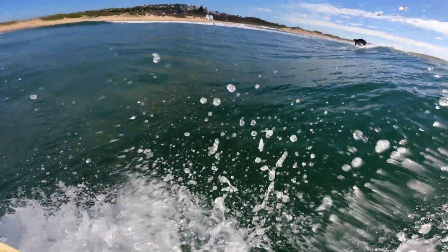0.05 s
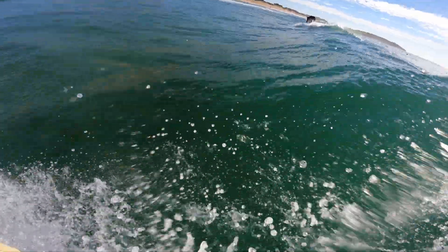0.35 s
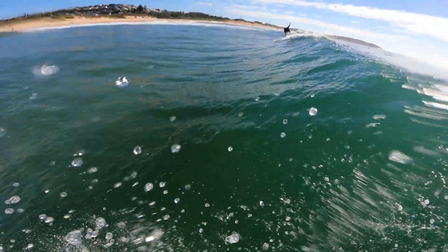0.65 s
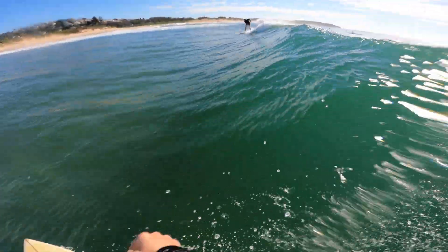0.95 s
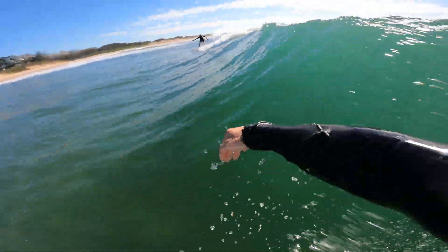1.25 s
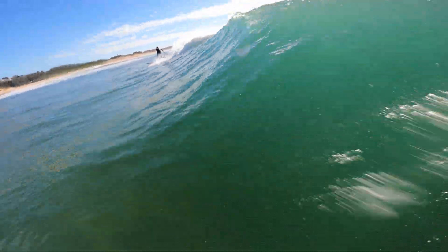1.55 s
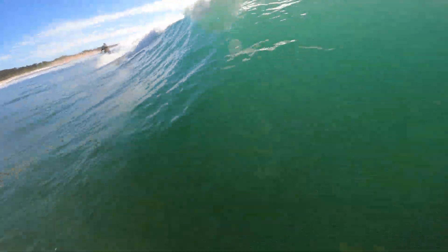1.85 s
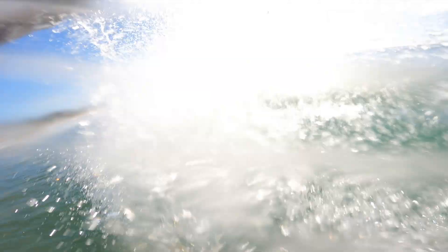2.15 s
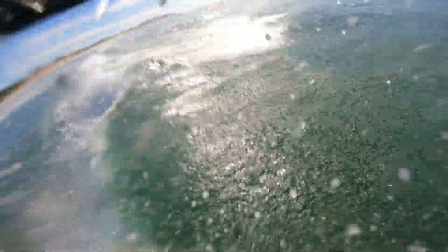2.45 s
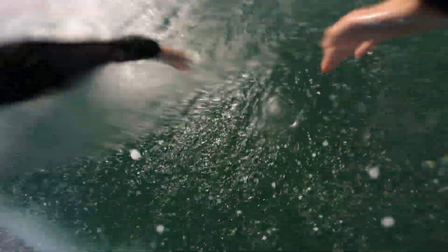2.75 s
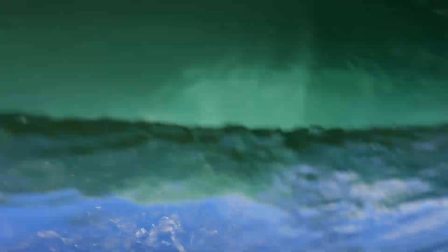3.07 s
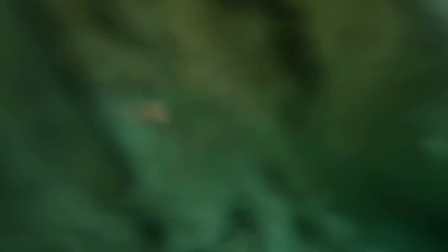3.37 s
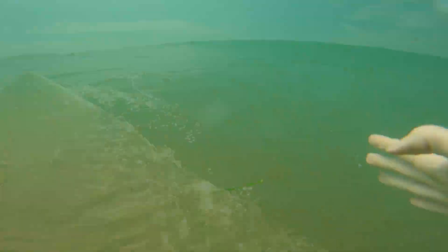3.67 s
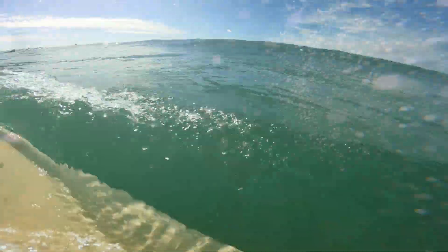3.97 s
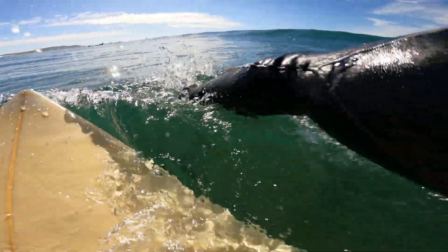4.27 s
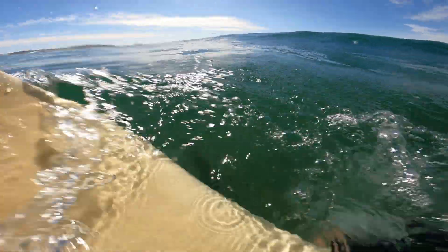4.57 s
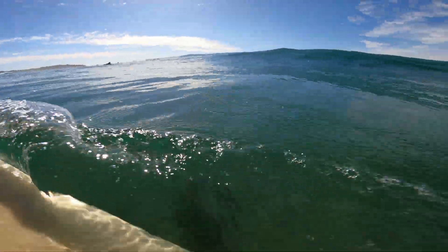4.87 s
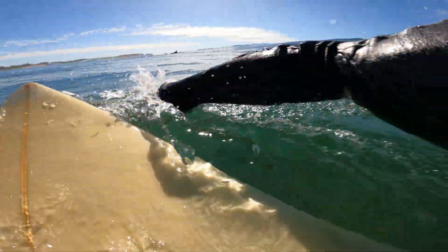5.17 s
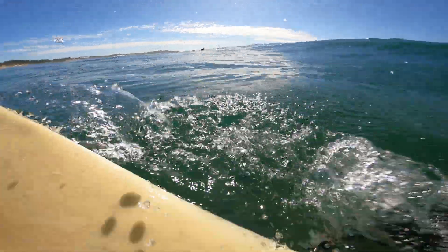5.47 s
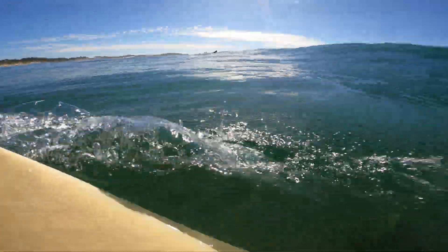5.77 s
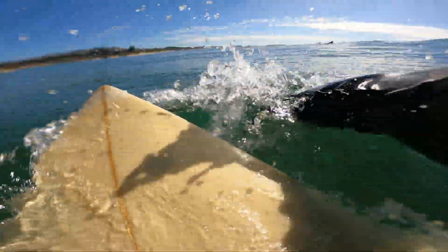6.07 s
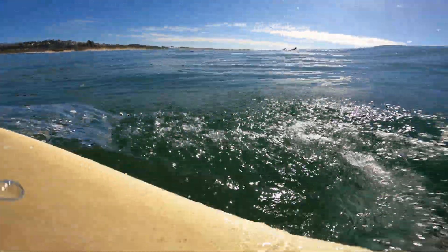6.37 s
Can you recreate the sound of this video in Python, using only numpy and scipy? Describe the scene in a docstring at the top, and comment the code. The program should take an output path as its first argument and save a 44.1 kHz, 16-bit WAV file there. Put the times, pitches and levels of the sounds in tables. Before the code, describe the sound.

From the start, water rushes past a surfboard with a fine hiss of spray, while wind and water buffet the close microphone with a steady low rumble. At about 2.3 seconds a wave crashes over it: sharp splashes and slaps lead into surges of churning white water, crackling foam and ticking drops, with more hard slaps around 3.2 seconds. At 3.6 seconds the microphone sinks, and the sound turns muffled and deep as big bubbles gurgle in gulps. It surfaces at about 4 seconds and the rumble is now much softer. Water laps and glugs against the board, and three arm strokes slosh in at roughly 4.2, 5.1 and 5.9 seconds, the middle one gentler. Each leaves a fizz of foam and a low push of water, with scattered drips and small slaps. The lapping continues until the end, at about 6.6 seconds.

```python
"""A surfer rides a wave, a camera close to the board: the wake rushes and throws spray while wind and
water buffet the microphone port. At 2.25 s the surfer falls; the lip crashes over the camera in
churning white water, slaps and drops. At 3.6 s the camera sinks and big bubbles gurgle.
At 4 s it surfaces, and three arm strokes slosh and fizz beside the board."""
import sys
import numpy as np
from scipy import signal
from scipy.fft import rfft, irfft, next_fast_len
from scipy.io import wavfile
from scipy.ndimage import uniform_filter1d, map_coordinates

SR = 44100
rng = np.random.default_rng(int(sys.argv[2]) if len(sys.argv) > 2 else 0)


def wrap_up_sound(samples):
    """Save the sound to the file named by the first command line argument, as 16-bit audio."""
    columns = np.atleast_2d(samples).T
    # keep every value between -1 and 1, then stretch to whole-number steps
    tamed = np.clip(columns, -1, 1)
    steps = np.round(tamed * 32767).astype(np.int16)
    wavfile.write(sys.argv[1], SR, steps)


N = 292383

FALL_S, DIVE_S, SURFACE_S = 2.25, 3.59, 3.978
# Tick of water on the housing. Each row: frequency in Hz, gain in dB.
TICK_SPECTRUM = [(500, -15), (1300, 3.5), (2200, -1.5), (3500, -8.5), (5500, -20), (7000, -35),
                 (10000, -60.5)]


def riding():
    """The rail cuts a rushing wake and throws a fine, even spray."""
    # Each row: time in seconds, relative level in dB.
    wake_levels = [(.05, -30.5), (.25, -26.5), (.35, -22), (.53, -23.5), (.62, -19.5), (.76, -23),
                   (1.03, -27), (1.09, -22), (1.19, -20.5), (1.28, -24), (1.57, -25.5), (1.66, -28.5),
                   (1.79, -30), (1.86, -37), (2.03, -30.5), (2.2, -29)]
    spray_levels = [(0.0, -38), (0.19, -45.5), (.6, -46), (0.81, -44.5), (.95, -48.5), (1.2, -50),
                    (1.35, -46.5), (1.71, -49.5), (2.2, -42)]
    # Each row: frequency in Hz, gain in dB.
    wake_spectrum = [(100, -16), (170, -5), (230, 1), (300, -0.5), (400, -4), (600, -10), (810, -10.5),
                     (1020, -34.5), (1500, -30.5), (2000, -42.5), (6000, -100.5)]
    spray_spectrum = [(400, -2.5), (850, -0.5), (1300, -7), (2000, -14), (2500, -8.5), (3000, -4),
                      (3400, -8), (4000, -20.5), (5000, -25.5), (6300, -33), (7500, -43.5), (10000, -57)]
    wake_bubbles = bubble_cloud(155.7, 1743, per_s=450, cycles=7.5, spread_db=1)
    wake = water(wake_spectrum, wake_bubbles, hiss_db=11)
    spray_bubbles = bubble_cloud(734, 7600, per_s=900, cycles=5.7, spread_db=3.5, ring_samples=300)
    spray = water(spray_spectrum, spray_bubbles, hiss_db=9.5)
    return amp(0.5) * gain_curve(wake_levels) * wake + amp(4.5) * gain_curve(spray_levels) * spray


def tumbling():
    """White water churns round the camera in surges; its foam crackles on the housing."""
    # Each row: start in seconds, hold in seconds, relative churn and foam levels in dB.
    surges = [(2.24, 0.028, -27, -26), (2.386, 0.17, -28.5, -34), (2.69, 0.076, -29.5, -34),
              (2.81, 0.071, -27, -33), (2.89, 0.078, -26.5, -39.5), (3.068, 0.095, -25, -55),
              (3.183, 0.077, -20, -39), (3.49, 0.058, -22.5, -39)]
    # Each row: frequency in Hz, gain in dB.
    churn_spectrum = [(110, -13), (190, -3), (300, -1.5), (450, -2.5), (620, -6.5), (850, -10.5),
                      (1300, -31), (6000, -85)]
    foam_spectrum = [(500, -20), (1000, 2), (1300, -2.5), (1600, -6), (2000, -8.5), (2600, -14),
                     (3200, -12.5), (4000, -24.5), (4900, -27.5), (6000, -36), (7500, -49.5), (10000, -78)]
    bed = envelope(FALL_S, DIVE_S - FALL_S, attack_s=0.016, release_s=0.025)
    churn_gain, foam_gain = amp(-33.5) * bed, amp(-42.5) * bed
    for start_s, hold_s, churn_db, foam_db in surges:
        surge = envelope(start_s, hold_s, attack_s=0.056, release_s=0.044) * bed
        churn_gain = np.hypot(churn_gain, amp(churn_db) * surge)
        foam_gain = np.hypot(foam_gain, amp(foam_db) * surge)
    churn_gain *= 1 - 0.4 * envelope(3.6, 0.11, attack_s=0.011, release_s=0.038)  # dip below the surface
    churn_bubbles = bubble_cloud(152, 1224, per_s=300, cycles=5.6, spread_db=1.5)
    churn = water(churn_spectrum, churn_bubbles, hiss_db=11)
    foam_bubbles = bubble_cloud(870, 7000, per_s=520, cycles=3, spread_db=4.5, ring_samples=300)
    foam = water(foam_spectrum, foam_bubbles, hiss_db=7) * flutter(rate_hz=130, depth_db=1)
    return churn_gain * churn + amp(-0.8) * foam_gain * foam


def submerged():
    """Under water the flow drums softly on the housing and big bubbles leave in gulps."""
    # Each row: start in seconds, hold in seconds, level in dB.
    gulps = [(3.598, 0.027, -16.5), (3.648, 0.076, -18.5), (3.76, 0.031, -19), (3.87, 0.03, -23.5)]
    # Each row: frequency in Hz, gain in dB.
    gurgle_spectrum = [(40, -14), (80, 16), (150, 12), (200, 4.5), (270, -9), (370, -3), (550, -5.5),
                       (680, -15.5), (1250, -23), (1550, -36.5), (2100, -48.5), (3200, -54), (5000, -67.5),
                       (8000, -84), (12000, -105)]
    gain = amp(-26.5) * envelope(DIVE_S, SURFACE_S - DIVE_S, attack_s=0.025, release_s=0.026)
    for start_s, hold_s, db in gulps:
        gain = np.hypot(gain, amp(db) * envelope(start_s, hold_s, attack_s=0.014, release_s=0.016))
    big_bubbles = bubble_cloud(238, 1337, per_s=770, cycles=20.6, spread_db=3)
    return gain * water(gurgle_spectrum, big_bubbles, hiss_db=7)


def paddling(drain_s=0.28, entry_over_fizz_db=11.5):
    """Water laps the board; each stroke sloshes in, leaves foam, shoves water aside, then lulls."""
    # Each row: hand entry in seconds, relative push and fizz levels in dB, fizz hold in seconds,
    # lull depth from 0 to 1, hand exit in seconds.
    strokes = [(4.203, -33.5, -43, 0.36, 0.44, 4.68), (5.118, -40, -47, 0.016, 0.4, 5.67),
               (5.878, -29, -42.5, 0.35, 0.24, 6.37)]
    # Each row: frequency in Hz, gain in dB.
    surge_spectrum = [(80, -30.5), (170, -4), (330, 1.5), (480, 1), (650, -7), (1000, -17.5), (6000, -99)]
    slosh_spectrum = [(300, -26), (550, -4.5), (750, 0), (1080, 0.5), (1300, -4.5), (1500, -9.5),
                      (1750, -14), (2100, -31.5), (3000, -30), (8000, -80.5)]
    fizz_spectrum = [(1300, -9.5), (2000, -10.5), (2500, -9), (2950, -4), (3500, -5.5), (3950, -20),
                     (4400, -15.5), (5100, -17), (5600, -26.5), (6400, -29.5), (7500, -40.5),
                     (10000, -63.5)]
    afloat = envelope(SURFACE_S, N / SR, attack_s=0.26, release_s=0.1)
    drained = envelope(SURFACE_S + drain_s, N / SR, attack_s=0.31, release_s=0.1)  # the port runs clear
    surge_gain, slosh_gain, fizz_gain = amp(-31.5) * afloat, amp(-29) * drained, amp(-46.5) * drained
    stir = np.ones(N)
    for entry_s, push_db, fizz_db, fizz_s, lull_depth, exit_s in strokes:
        entry = envelope(entry_s, 0.13, attack_s=0.19, release_s=0.13)
        foam = envelope(entry_s + 0.081, fizz_s, attack_s=0.16, release_s=0.016)
        pull = envelope(entry_s + 0.37, 0.069, attack_s=0.19, release_s=0.13)
        slosh_gain = np.hypot(slosh_gain, amp(fizz_db + entry_over_fizz_db) * entry)
        fizz_gain = np.hypot(fizz_gain, amp(fizz_db) * foam)
        surge_gain = np.hypot(surge_gain, amp(push_db) * pull)
        stir *= 1 - lull_depth * envelope(exit_s, 0.015, attack_s=0.03, release_s=0.13)
    surge_bubbles = bubble_cloud(133.2, 795, per_s=320, cycles=9.1, spread_db=2)
    surge = water(surge_spectrum, surge_bubbles, hiss_db=9.5)
    slosh_bubbles = bubble_cloud(453.3, 2450, per_s=600, cycles=25.3, spread_db=1.5)
    slosh = water(slosh_spectrum, slosh_bubbles, hiss_db=8) * flutter(rate_hz=22, depth_db=0.8)
    fizz_bubbles = bubble_cloud(1600, 7000, per_s=700, cycles=48, spread_db=0, ring_samples=700)
    fizz = water(fizz_spectrum, fizz_bubbles, hiss_db=6) * flutter(rate_hz=25, depth_db=1.5)
    lapping = amp(-0.5) * surge_gain * surge + amp(-0.3) * slosh_gain * slosh
    return stir * lapping + np.sqrt(stir) * amp(-0.5) * fizz_gain * fizz


def slaps(decay_per_cycle=3.325, crack_db=-13):
    """Solid water strikes the housing: a hard push that rebounds once or twice, a crack on top."""
    # Each row: start in seconds, relative peak in dB, pitch in Hz.
    strikes = [(2.261, -6.5, 1000), (2.272, -10, 1700), (2.351, -13.5, 1065), (2.359, -14, 1150),
               (2.397, -15, 1320), (2.497, -12, 1150), (2.502, -13, 510), (2.834, -17, 1900),
               (3.05, -21, 730), (3.206, -5.5, 1300), (3.264, -5.5, 520), (4.23, -10, 680),
               (4.634, -18, 750), (4.639, -14, 330), (4.976, -11, 600), (4.997, -18, 950)]
    track = np.zeros(N)
    t = np.arange(SR // 30) / SR
    for start_s, db, hz in strikes:
        turns = t * hz
        push = np.sin(2 * np.pi * turns) * turns ** 2 * np.exp(-decay_per_cycle * turns)
        crack = tick(t, attack_s=0.00053, decay_s=0.001)
        add(track, start_s, amp(db) * (push / np.abs(push).max() + amp(crack_db) * crack))
    return coloured(track, [(4000, -2), (7500, -17.5), (11000, -35)])


def sheets(width_octaves=0.97, spiky_db=4.5, lead_s=0.015):
    """Sheets of water hit the housing, each led by its spray: spiky bursts with a broad peak."""
    # Each row: start in seconds, relative level in dB, length in seconds, peak in Hz, treble in dB.
    hits = [(1.605, -43.5, 0.036, 4000, 10), (2.255, -19.5, 0.058, 2000, 0.5),
            (2.342, -23, 0.024, 1440, -6), (2.352, -22, 0.054, 950, -12), (2.396, -26.5, 0.047, 1440, -11),
            (2.447, -27.5, 0.039, 1200, -17), (2.489, -22, 0.015, 1300, -17), (3.159, -22, 0.018, 500, -6),
            (3.184, -22, 0.032, 1690, -6), (3.197, -16, 0.017, 600, 4), (3.251, -16.5, 0.011, 2000, 8.5),
            (3.27, -27, 0.027, 700, -2), (3.507, -26.5, 0.013, 1000, 4), (3.558, -34, 0.02, 2810, -3),
            (3.975, -36.5, 0.017, 1100, -21), (6.535, -38, 0.041, 2960, -5)]
    # Each row: frequency in Hz, gain in dB.
    sheet_spectrum = [(150, 3.5), (350, 2.5), (1000, 2), (1550, 1), (1750, -7.5), (2100, -2.5),
                      (2550, -12.5), (3050, -11), (3500, -13), (4000, -20), (4900, -20), (6000, -33),
                      (8000, -50), (12000, -55.5)]
    track = np.zeros(N)
    t = np.arange(SR // 5) / SR
    leading_spray = [(start_s - lead_s, db - 5, lead_s, hz * 1.5, treble_db + 3.5)
                     for start_s, db, _, hz, treble_db in hits]
    for start_s, db, length_s, hz, treble_db in list(hits) + leading_spray:
        swell = (1 - np.exp(-t / 0.0033)) * np.exp(-(t / length_s) ** 2)
        patter = rng.standard_normal(len(t))
        patter *= amp(spiky_db * np.repeat(rng.standard_normal(len(t)), 20)[:len(t)])
        peak = [(hz / 2 ** width_octaves, -7), (hz, 0), (hz * 2 ** width_octaves, -7)]
        body = coloured(coloured(patter, peak), sheet_spectrum)
        burst = coloured(body, [(3000, 0.0062), (7500, treble_db)])
        add(track, start_s, amp(db) * swell * unit(burst))
    return amp(-1) * track


def glugs(waver_rad=0.59, splash_db=-13, shed_db=-9):
    """An air pocket rings with a splash, glides as it opens or is squeezed, and sheds two bubbles."""
    # Each row: time in seconds, relative peak in dB, pitch in Hz, glide in octaves, decay in seconds.
    pockets = [(0.665, -23, 714, 0, .018), (2.271, -19, 1650, -0.3, 0.0062), (2.299, -23, 1400, .1, 0.0099),
               (2.341, -22, 1400, 0, 0.0049), (2.354, -17, 1120, -0.3, .014), (2.382, -20, 800, -.1, 0.012),
               (2.39, -20, 1000, 0.1, 0.011), (2.418, -27, 1860, -.1, .006),
               (3.052, -25, 730, -0.1, 0.0054), (3.081, -29, 850, -.1, 0.011), (3.104, -26, 709, .2, 0.01),
               (3.205, -11, 434, 0.14, 0.006), (3.216, -4.5, 266.5, .2, 0.0067),
               (3.251, -18.5, 2070, -.2, 0.0029), (3.263, -13, 1250, -.6, 0.0054),
               (3.277, -10.5, 543, -0.2, 0.0051), (3.292, -27, 1200, -.1, 0.0068),
               (3.295, -17, 618, -.2, 0.0065), (3.526, -11.5, 294, -0.19, 0.008),
               (3.59, -8.5, 191, 0, 0.024), (3.607, -10.5, 326.4, -0.43, 0.0055),
               (3.654, -15.5, 553, 0.011, 0.0059), (3.759, -19.5, 377, .1, 0.0097),
               (3.785, -21.5, 532.4, 0.19, 0.019), (3.881, -19.5, 559, -0.21, 0.0041),
               (4.19, -18.5, 784, 0.22, 0.0067), (4.235, -18, 536, -.6, 0.0047),
               (4.265, -24, 738, -.1, .018), (4.459, -19, 451, -0.55, 0.0045), (4.551, -18, 970, .1, .009),
               (4.563, -14.5, 262, -0.27, 0.0074), (4.593, -15.5, 950, -.1, 0.0063),
               (4.636, -18.5, 770, -.3, 0.0085), (4.639, -16, 388.4, -0.53, 0.0072),
               (4.7, -24, 1038, 0.27, 0.004), (4.738, -15.5, 983, 0.38, 0.0094),
               (4.86, -20, 990, -.1, 0.0055), (4.883, -16.5, 950, -0.38, 0.0066),
               (4.914, -18, 897, .2, 0.0068), (4.98, -16.5, 499, 0.1, 0.012),
               (4.995, -17.5, 920, 0.2, 0.008), (5.03, -19.5, 366, -0.22, 0.013),
               (5.122, -18, 351, .1, 0.0046), (5.205, -17, 930, -.1, 0.0063), (5.27, -20, 599, .1, 0.0053),
               (5.461, -20, 767, .3, 0.0079), (5.467, -14, 291, 0.057, 0.0068),
               (5.508, -15.5, 540, .15, 0.0079), (5.526, -17.5, 193, -0.53, 0.019),
               (5.527, -18, 970, 0.14, 0.009), (5.58, -18.5, 391, -0.08, 0.006),
               (5.632, -19, 1000, 0.11, 0.005), (5.713, -15, 767, 0.059, 0.0047),
               (5.735, -25, 900, -.3, 0.0061), (5.791, -16, 254.6, .2, 0.0084),
               (5.832, -15.5, 561, .1, 0.0075), (6.115, -18.5, 1110, .1, 0.022),
               (6.222, -15.5, 435.3, 0.013, 0.016), (6.281, -14.5, 373, 0.7, 0.0046),
               (6.313, -16.5, 284.2, .1, 0.0082), (6.328, -20, 324.5, -0.075, 0.0082),
               (6.405, -22, 463, .1, .006), (6.458, -17.5, 1055, 0, 0.0093), (6.468, -16, 491, 0.29, .007),
               (6.51, -19.5, 457, .2, 0.011)]
    track = np.zeros(N)
    t = np.arange(SR // 6) / SR - 1 / 20
    for peak_s, db, hz, glide_octaves, decay_s in pockets:
        age = t / decay_s
        swell = np.exp(-(np.minimum(age, 0) / 0.63) ** 2 - np.maximum(age, 0) ** 0.96)
        turns = np.cumsum(hz * 2 ** (glide_octaves * np.tanh(age))) / SR
        wall_shake = waver_rad * map_coordinates(rng.standard_normal(256), [turns / 2], mode="wrap")
        ring = np.sin(2 * np.pi * turns + wall_shake)
        splash = noise(len(t), [(hz / 4, -8), (hz, 0), (2 * hz, -9), (5 * hz, -36), (10 * hz, -80)])
        add(track, peak_s + t[0], amp(db) * swell * (ring + amp(splash_db) * splash))
        for lateness, pitch in rng.random((2, 2)):
            shed_hz = hz * (0.692 + 0.45 * pitch)
            shed = bubble(t[t >= 0] * shed_hz, cycles=14, rise=0.17)
            add(track, peak_s + 0.024 * lateness, amp(db + shed_db) * shed)
    return amp(-3) * track


def drops():
    """A drop ticks on the housing and traps one small bubble."""
    # Each row: start in seconds, relative level in dB, pitch in Hz, tick against bubble in dB.
    landings = [(.651, -31, 1050, -10), (.778, -16.5, 1490, -11), (1.089, -30.5, 1750, -2.5),
                (2.038, -17, 970, -17), (2.199, -24, 1750, -13), (2.452, -21, 1820, -12),
                (2.492, -16, 1540, -11), (2.574, -31, 1410, -7), (2.634, -21, 904, -15),
                (2.675, -18, 1580, -20), (2.706, -16, 1260, -13.5), (2.772, -25, 1230, -8),
                (2.79, -25, 1260, -9), (2.801, -19.5, 1430, -10), (2.833, -14, 1790, -8.5),
                (2.928, -25, 1360, -10), (2.939, -24, 1360, -11), (2.974, -27, 1460, -8),
                (2.988, -29, 1205, -9), (3.011, -28, 1480, -11), (3.07, -27, 1690, -15),
                (3.138, -25, 1690, -12), (3.161, -19, 1840, -10), (3.516, -14.5, 1240, -28),
                (4.221, -17.5, 1777, -16), (4.634, -27, 3100, -8), (4.704, -36, 3840, -9),
                (5.17, -25.5, 3770, -16), (5.202, -23, 1640, -10), (5.388, -22, 2550, -5),
                (6.523, -28, 3250, -1)]
    track = np.zeros(N)
    t = np.arange(SR // 20) / SR
    for start_s, db, hz, tick_db in landings:
        impact = amp(tick_db) * tick(t, attack_s=0.00041, decay_s=0.0023)
        add(track, start_s, amp(db) * (bubble(t * hz, cycles=13, rise=0.039) + impact))
    return amp(-0.5) * coloured(track, [(5500, 0), (7500, -10.5), (11000, -30)])


def sizzles(width_hz=300):
    """Air driven under by the lip or a stroke rings in a band that drifts as bubbles merge and burst."""
    # Each row: centre in seconds, relative level in dB, half length in seconds, first and last Hz.
    clouds = [(2.35, -39, 0.015, 3060, 3000), (2.414, -39, 0.017, 3100, 3080),
              (4.395, -45, 0.12, 3880, 3840), (4.438, -44, 0.12, 3060, 2980),
              (4.557, -42, 0.081, 3360, 3150), (5.898, -45.5, 0.1, 3635, 3175),
              (6.102, -49.5, 0.18, 3970, 4140), (6.144, -42.5, .14, 3040, 3190)]
    track = np.zeros(N)
    t = np.arange(SR) / SR - 0.5
    for centre_s, db, half_s, first_hz, last_hz in clouds:
        hz = np.interp(t, [-half_s, half_s], [first_hz, last_hz])
        swarm = noise(len(t), [(width_hz, 0), (2 * width_hz, -16), (8 * width_hz, -75)])
        ring = np.sqrt(2) * np.sin(2 * np.pi * np.cumsum(hz) / SR)
        add(track, centre_s + t[0], amp(db) * np.exp(-(t / half_s) ** 2) * swarm * ring)
    return amp(0.5) * track


def buffeting():
    """Eddies of air and water press on the port; the flow holds their strength fairly even."""
    # Each row: time in seconds, relative level in dB.
    levels = [(0, -21.5), (.12, -25), (.22, -19), (1.5, -19), (1.98, -22.5), (2.25, -18), (2.6, -18.5),
              (2.98, -17), (3.1, -29.5), (3.2, -14), (3.57, -15.5), (3.66, -24), (3.9, -29.5), (4.07, -35),
              (4.57, -30), (5.2, -31.5), (6.33, -31.5), (6.63, -40)]
    # Each row: frequency in Hz, gain in dB.
    rumble_spectrum = [(12, -6), (28, -2), (55, 0), (85, 0), (150, -4), (210, -9), (320, -23.5),
                       (700, -70.5), (3000, -110)]
    eddies = noise(N, rumble_spectrum)
    running_rms = np.sqrt(np.abs(uniform_filter1d(eddies ** 2, size=4000)) + 1e-6)
    return amp(-1.12) * gain_curve(levels) * eddies / running_rms


def water(spectrum, cloud, hiss_db):
    """Single bubbles over the blur of countless small ones, rms 1."""
    return unit(coloured(cloud + amp(hiss_db) * rng.standard_normal(N), spectrum))


def bubble_cloud(low_hz, high_hz, per_s, cycles, spread_db, ring_samples=1500):
    """Bubbles of random time, strength and pitch, flat in spectrum, rms 1."""
    when, pitch, strength = rng.random((int(per_s * N / SR), 3)).T
    hz = low_hz * (high_hz / low_hz) ** pitch
    gain = amp(-spread_db * np.log(np.maximum(strength, 0.03))) * np.sqrt(hz)
    offsets = np.arange(ring_samples)
    turns = np.linspace(0, 2 * cycles, 2048)
    rings = np.interp(hz[:, None] * offsets / SR, turns, bubble(turns, cycles, rise=0.21))
    index = (when * N).astype(int)[:, None] + offsets
    return unit(np.bincount(index.ravel(), (gain[:, None] * rings).ravel(), N)[:N])


def bubble(turns, cycles, rise):
    """A bubble rings down 40 dB in `cycles` periods, its pitch rising as it nears the surface."""
    age = turns / cycles
    ring = np.sin(2 * np.pi * turns * (1 + rise * age / 2))
    return ring * np.exp(-np.log(100) * age) * (1 - np.exp(-2 * turns))


def tick(t, attack_s, decay_s):
    """Noise burst of water meeting the housing."""
    return noise(len(t), TICK_SPECTRUM) * np.exp(-t / decay_s) * (1 - np.exp(-t / attack_s))


def envelope(start_s, hold_s, attack_s, release_s):
    """Gain that swells up to start_s, holds, then dies away."""
    t = np.arange(N) / SR - start_s
    return np.exp(-(np.minimum(t, 0) / attack_s) ** 2 - np.maximum(t - hold_s, 0) / release_s)


def gain_curve(points, fade_s=0.11):
    """Gain through (seconds, dB) points, fading out beyond both ends."""
    times_s, db = np.transpose(points)
    t = np.arange(N) / SR
    gate = np.clip(1 + np.minimum(t - times_s[0], times_s[-1] - t) / fade_s, 0, 1)
    return gate * amp(np.interp(t, times_s, db))


def flutter(rate_hz, depth_db):
    """Smooth random gain, rms 1."""
    knots = rng.standard_normal(4096)
    return unit(amp(depth_db * map_coordinates(knots, [np.arange(N) * rate_hz / SR], mode="wrap")))


def noise(samples, spectrum):
    """Coloured noise, rms 1."""
    return unit(coloured(rng.standard_normal(samples), spectrum))


def coloured(x, spectrum):
    """Minimum-phase filter through (Hz, dB) points."""
    size = next_fast_len(len(x) + 8192, real=True)
    hz, db = np.transpose(spectrum)
    gain = amp(np.interp(np.log(np.fft.rfftfreq(size, 1 / SR) + 1), np.log(hz), db))
    cepstrum = irfft(np.log(gain), size)
    cepstrum[1:size // 2] *= 2
    cepstrum[size // 2 + 1:] = 0
    return irfft(rfft(x, size) * np.exp(rfft(cepstrum)), size)[:len(x)]


def add(track, start_s, sound):
    """Mix a sound into a track."""
    part = track[max(round(start_s * SR), 0):][:len(sound)]
    part += sound[:len(part)]


def amp(db):
    """Decibels to gain."""
    return 10 ** (np.asarray(db) / 20)


def unit(x):
    """Scale to rms 1."""
    return x / np.sqrt(np.mean(x ** 2) + 1e-20)


def scene():
    """All sources at one microphone."""
    impacts = sheets() + slaps() + drops() + glugs()
    return (buffeting() + riding() + tumbling() + submerged() + paddling() + sizzles() + impacts)[None]


def record(dry):
    """The waterproof membrane dulls the treble; the band ends at 14 kHz."""
    dull = coloured(dry[0], [(6500, 0.5), (8000, -1.5), (11000, -5)])
    return signal.sosfilt(signal.butter(12, 14000, fs=SR, output="sos"), dull)[None]


dry = scene()
out = record(dry)
wrap_up_sound(out)
```